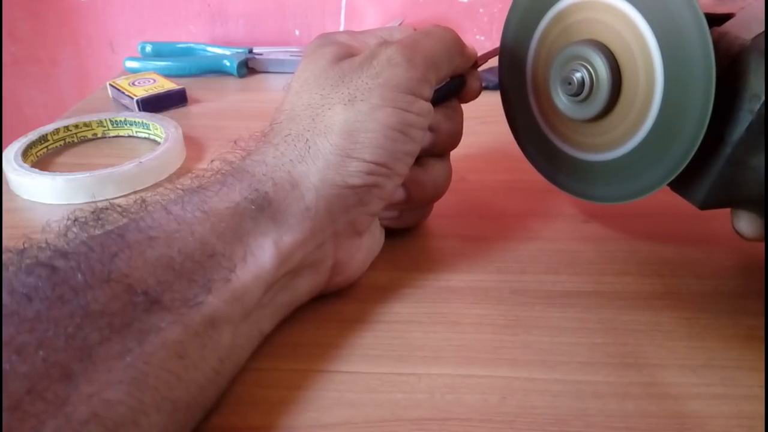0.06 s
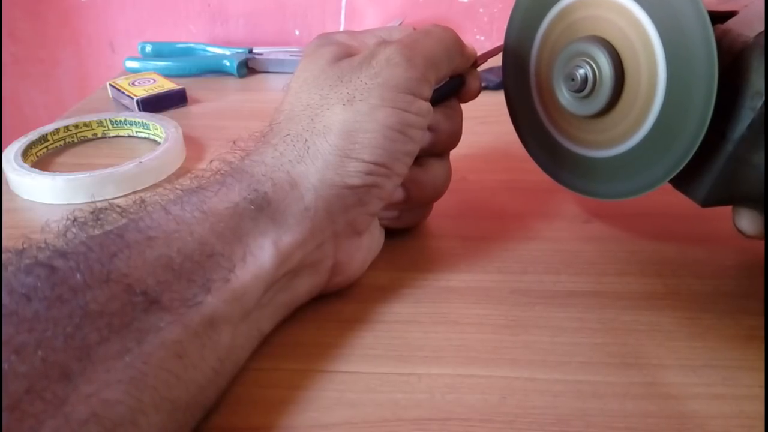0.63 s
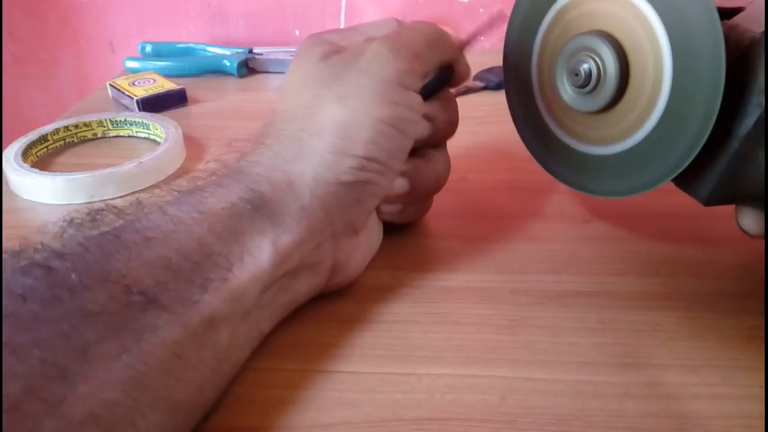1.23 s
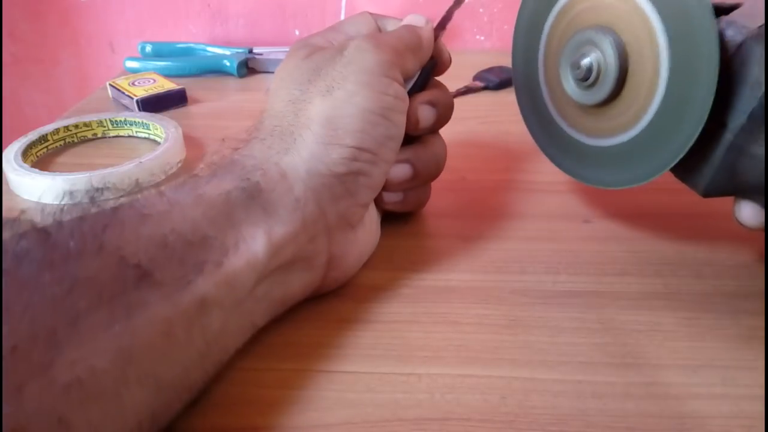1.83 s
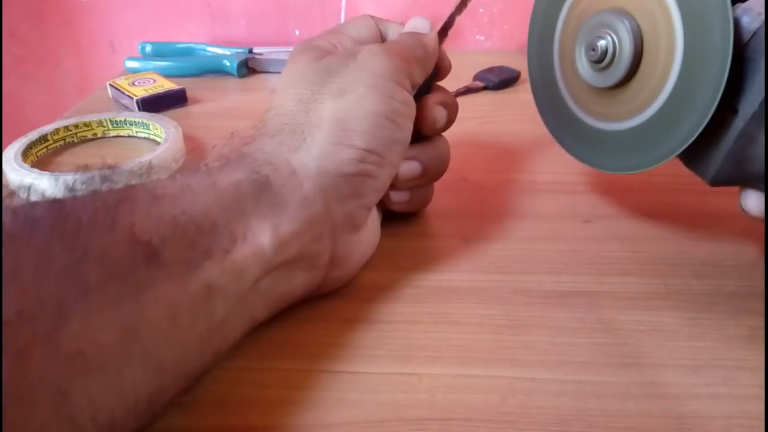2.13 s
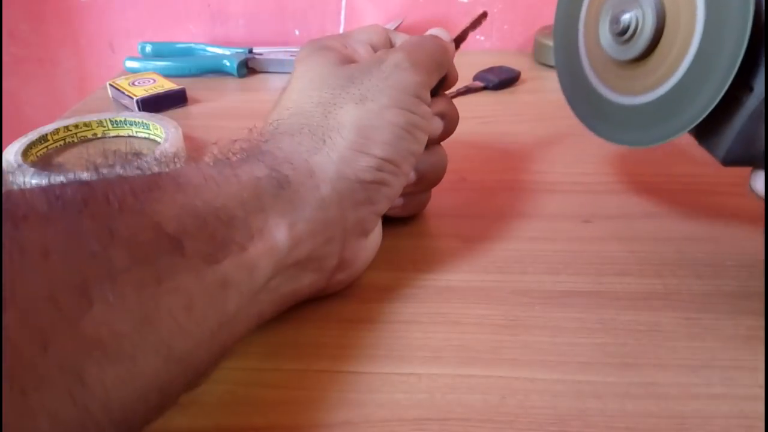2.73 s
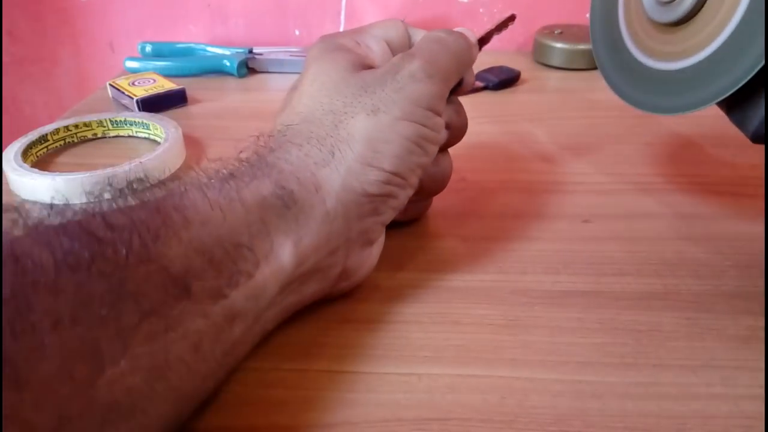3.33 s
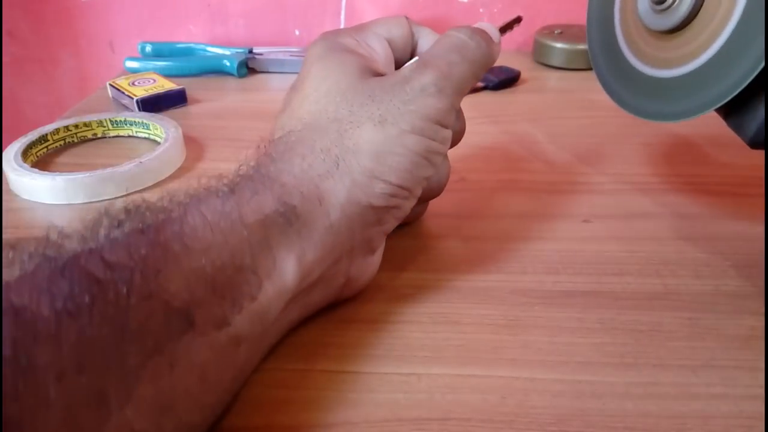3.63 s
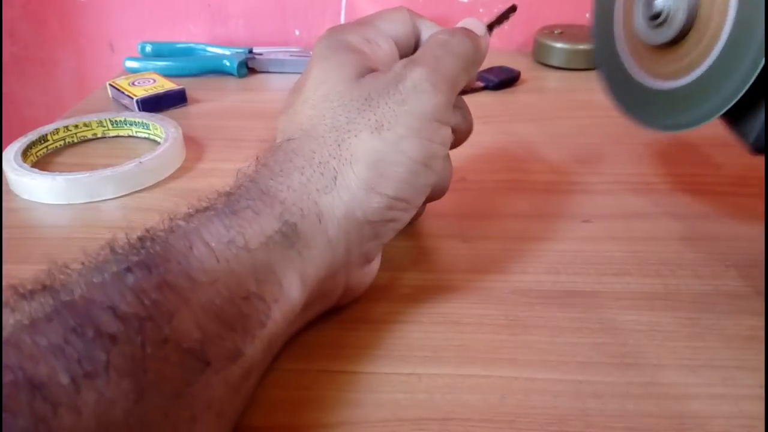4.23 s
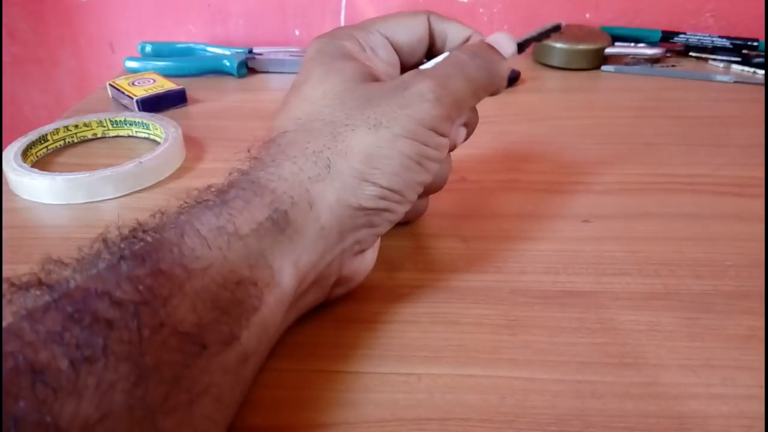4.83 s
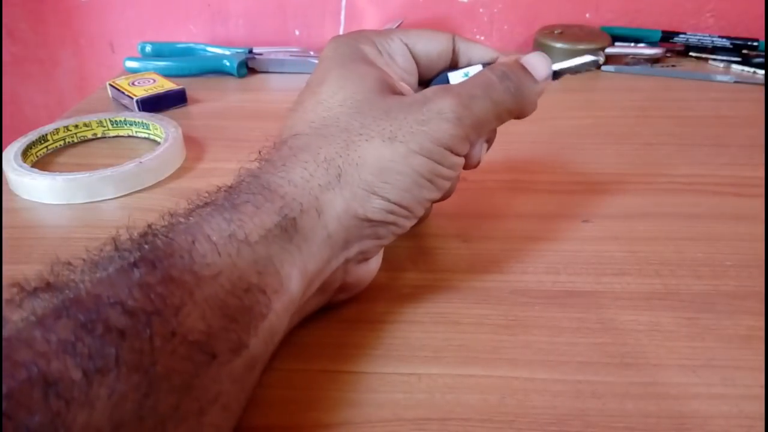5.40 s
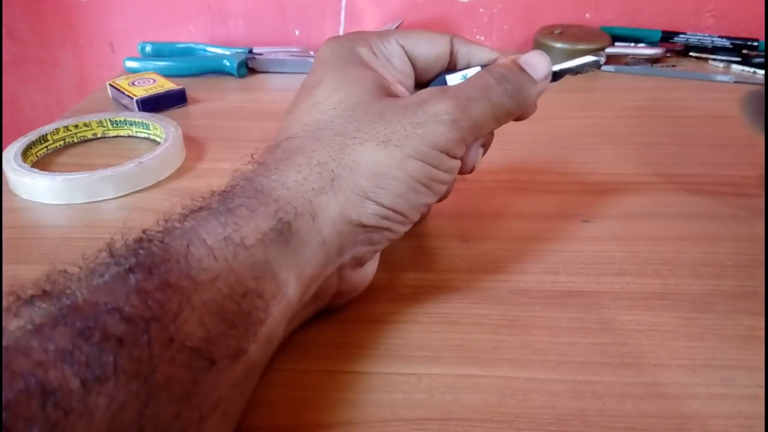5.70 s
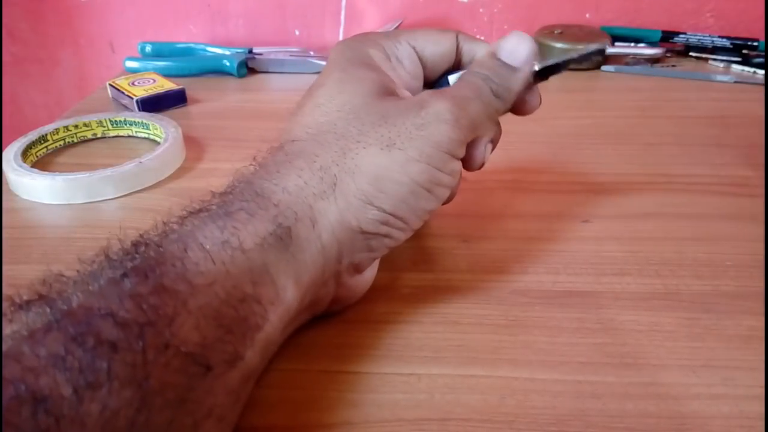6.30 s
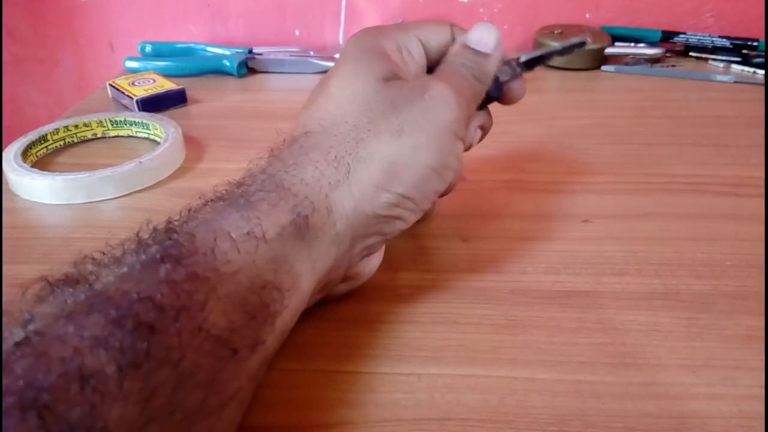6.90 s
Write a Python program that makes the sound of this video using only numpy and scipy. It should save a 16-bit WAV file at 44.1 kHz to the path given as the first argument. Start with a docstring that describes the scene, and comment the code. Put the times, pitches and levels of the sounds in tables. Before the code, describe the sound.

An angle grinder is already running close by, with a steady high whine, a rush of air and a buzz of gears. During the first second a metal key touches the wheel in three light strokes, each a fine, high hiss. The motor sounds a little louder and clearer just after that. At about 1.9 seconds the power goes off, and the whine falls steadily in pitch and fades. From about 3 to 4.5 seconds the slowing gears give quick, hard knocks and small metallic pings as the tool moves slightly left. A bright, ringing rattle carries on and slows, breaking into sharp clacks from about 5.7 seconds and stopping near 6.3. At about 6.6 seconds the grinder is put down on a hollow surface with a soft thud, a few small bumps and a faint slide. The room is small and quiet.

```python
"""An angle grinder whines beside a table while a metal key touches its wheel in three light, hissing strokes.
The hand pulls back, the power goes off, and air drag and friction slow the rotor, so every tone locked
to it falls. Tooth impacts excite the resonances of gears and casing: as the grinder is carried aside
they knock and rattle on to a few last clacks. It is put down on a hollow surface with a soft thud."""
import sys
import numpy as np
from scipy import signal
from scipy.fft import irfft
from scipy.io import wavfile
from scipy.ndimage import uniform_filter1d, map_coordinates

SR = 44100
rng = np.random.default_rng(int(sys.argv[2]) if len(sys.argv) > 2 else 0)


def persist_wave(psi):
    """Save psi, clipped to +-1, as 16-bit WAV."""
    counts = np.round(np.clip(psi, -1, 1) * 32767).astype(np.int16)
    wavfile.write(sys.argv[1], SR, np.atleast_2d(counts).T)


N = 315305
T = np.arange(N) / SR
RUN_HZ, POWER_OFF_S, STOP_S = 558.8, 1.883, 6.317
PINION_TEETH, WHEEL_TEETH, COMMUTATOR_BARS = 11, 39, 12

# Direction of the grinder: time_s, left_ear_lead_ms, left_over_right_db
BEARING = [(0, 0.069, -2), (2.6, 0.11, -1.5), (4.2, 0.38, -1), (4.7, 0.363, 2), (5.8, 0.34, 0)]
# Level law of the fan: full_speed_db, loss_per_speed_halving_db, hand_shadow_db, aside_loss_db
FAN_LEVEL = (-25, 2.5, 3, 10)


def rotor_speed():
    """Turns per second: steady under power, then braked by quadratic air drag and constant friction."""
    drag_shape = .9526  # larger means a steeper first fall
    remaining = np.clip((STOP_S - T) / (STOP_S - POWER_OFF_S), 0, 1)
    return RUN_HZ * np.tan(drag_shape * remaining) / np.tan(drag_shape)


def whine(speed, turns):
    """Rotor unbalance radiates a tone; as it falls, its echoes interfere differently at each ear."""
    # Level law: full_speed_db, loss_per_speed_halving_db, hand_shadow_db, aside_loss_db
    whine_level = (-28.3, 9.8, 5, 6.5)
    # Reflections from table and walls: delay_ms, gain
    left_echoes = [(3.92, .65), (5.44, .35), (7.12, .65), (10.36, .35), (17.16, .25), (20.28, .35),
                   (35.56, .15), (45.04, .15), (48.08, .15)]
    right_echoes = [(3.76, .25), (7.0, .8), (15.52, .5), (17.28, .5), (19.92, .15), (30.96, .35),
                    (38.68, .25), (55.2, .15), (64.92, .15)]
    # Brief dips of the tone: middle_s, half_length_s, left_db, right_db
    dips = [(2.21, .025, 0, -7), (2.3, .022, -9, 0), (2.49, .028, -20, -3), (2.82, .025, -8, -2),
            (3.03, .03, -8, 0), (3.495, .028, -7, -8), (3.85, .028, -10, -3), (4.45, .025, -10, -8)]
    waver = amp(.7 * drift(5))
    swung_away = amp(-9 * (1 - until(4.36, 0.16))) * until(4.85, 0.12)
    tone = np.sqrt(2) * np.sin(2 * np.pi * turns)
    direct = place(source_gain(speed, whine_level) * waver * swung_away * tone)
    echoed = [ear + sum(gain * np.interp(T - ms / 1000, T, ear) for ms, gain in echoes)
              for ear, echoes in zip(direct, (left_echoes, right_echoes))]
    dip_db = sum(np.outer(ears_db, swell(s, half_s)) for s, half_s, *ears_db in dips)
    return amp(dip_db) * np.array(echoed)


def wheel_wobble(speed, turns):
    """Wheel and rotor give combination tones; the slowing wobble sweeps through a table resonance."""
    # Combination tones: rotor_multiple, wheel_multiple, relative_db
    orders = [(0, 1, -34.5), (0, 2, -20.5), (0.999, -1, -26.5), (1, 1, -17.5)]
    rotor = 2 * np.pi * turns
    wheel = rotor * PINION_TEETH / WHEEL_TEETH
    boom = amp(-48 + 1.5 * drift(10)) * resonate(np.sin(wheel), hz=97.6, width_hz=13)
    tones = sum(amp(db + 4.8 * drift(0.55)) * np.sin(a * rotor + b * wheel) for a, b, db in orders)
    tones *= amp(-1) * source_gain(speed, FAN_LEVEL) * until(POWER_OFF_S, 0.59)
    return np.sqrt(2) * (boom * until(3.55, 0.18) + tones)


def rotor_harmonics(speed, turns):
    """Harmonics of the rotation; the lowest two swell in turn as they fall through a shell resonance."""
    # Harmonic series: rotor_multiple, relative_db, right_ear_lag_cycles
    orders = [(2, -13, .05), (3, -9, .24), (5, -15, .15), (7, -14.5, .42), (9, -13, .42), (10, -18, .05),
              (11, -15.5, .4), (12, -11, .25), (13, -18, .2)]
    angle = 2 * np.pi * turns
    shaft = angle + .04 * drift(11)
    tones = sum(amp(db + 2.8 * drift(4.2)) * np.sin([k * shaft, k * shaft - 2 * np.pi * lag])
                for k, db, lag in orders)
    tones *= amp(-1) * source_gain(speed, FAN_LEVEL) * until(POWER_OFF_S, 0.59)
    lowest = sum(amp(db) * np.sin(k * angle + 1.1 * drift(60)) for k, db in [(2, -36.5), (3, -42)])
    shell = resonate(lowest, hz=660, width_hz=160) * until(4.3, 0.3)
    return np.sqrt(2) * (tones + shell)


def commutator(speed, turns):
    """The brushes' bar-passing tones whistle in turn as they fall through the housing's passband."""
    # Brush tones: bar_rate_multiple, level_db
    harmonics = [(1, -31), (2, -30.8)]
    # Radiation response of the housing: frequency_hz, gain_db
    housing = [(3000, -24), (3650, -13), (3950, -9), (4150, -2.5), (4500, 0), (4950, 1), (5150, -8),
               (5900, -18), (6800, -28)]
    phase = 2 * np.pi * COMMUTATOR_BARS * turns + .35 * drift(35) + .17 * drift(220)
    bar_hz = COMMUTATOR_BARS * speed
    tones = sum(amp(db + value_at(housing, k * bar_hz) + 2.5 * drift(40)) * np.sin(k * phase)
                for k, db in harmonics)
    return np.sqrt(2) * tones * until(4.7, .2)


def mains_hum(turns):
    """While powered, the motor hums at 100 Hz, with a sum tone from modulation by the rotation."""
    mains = 2 * np.pi * 100 * T
    hum = amp(-58.5) * np.sin(mains) + amp(-63) * np.sin(2 * np.pi * turns + mains)
    return np.sqrt(2) * until(POWER_OFF_S, 0.042) * hum


def gear_train(speed, turns):
    """Impact excitation: tooth blows ring the gears, shake the casing and modulate the fan's rush."""
    turning, looseness = until(6.12, 0.036), 1 - until(4.35, 0.26)
    blows = tooth_blows(turns, spread_db=4, decay_s=0.001)
    scrape_power = .45 * looseness * (1 - blows ** 2)  # loose teeth scrape between blows
    blows = turning * np.sqrt(blows ** 2 + scrape_power)
    bite = tight_spot(turns)
    drive = blows * np.sqrt(bite)
    steel = np.sqrt(looseness) * loose_gears(drive, ring_drive=blows * bite)
    steel += np.sqrt(1 - looseness) * meshed_gears(speed, drive)
    buzz = housing_buzz(drive)
    body = casing_chatter(speed, turns, drive) + fan_rush(speed, drive, turning)
    body *= amp(4.5 * swell(5.98, 0.086))  # the last slow turns grate
    dip = amp(-3.5 * swell(2.1, 0.011))
    return dip * (body + steel + buzz)


def tooth_blows(turns, spread_db, decay_s):
    """Envelope of an impulse train at the meshing rate: each tooth strikes with a random force."""
    meshing = np.diff(np.floor(turns * PINION_TEETH + .3 * drift(200)), prepend=0) > 0
    unevenness = 0.35 + 0.76 * until(4.06, 0.7)  # slow teeth strike more evenly
    force_db = unevenness * spread_db * np.clip(rng.standard_normal(N), -3, 2.5)
    power = signal.lfilter([1], [1, -np.exp(-2 / (decay_s * SR))], meshing * amp(force_db) ** 2 + 1e-12)
    mean_power = abs(uniform_filter1d(power, size=3500))
    return np.sqrt(power / (mean_power + 1e-6))


def tight_spot(turns):
    """Amplitude modulation: loose gears bite once a turn, harder as they slow, easing near the stop."""
    bite = np.exp(2.8 * (np.cos(2 * np.pi * turns) - 1))
    depth = 3.4 * (1 - until(4.3, 1.3)) * until(5.8, .45)
    return np.sqrt((1 + depth * bite * amp(1.5 * drift(30))) / (1 + depth / 4))


def meshed_gears(speed, drive):
    """Forced vibration of tightly meshed gears, weaker once the motor stops loading them."""
    # Spectrum of the gear steel: frequency_hz, level_db
    spectrum = [(1710, -24.5), (2900, -3.5), (3870, -3.5), (4490, -2), (5700, 1.5), (6130, 4.5),
                (6370, 1.5), (6520, 5.5), (6900, -5), (7400, -4.5), (8050, -12), (9070, -10.5),
                (11600, -17), (12700, -11.5), (13500, -29.5), (14700, -4.5), (15600, -14.5)]
    # Level law: full_speed_db, loss_per_speed_halving_db, hand_shadow_db, aside_loss_db
    gear_level = (-19.5, 0.1, 2, -5.5)
    unloading = amp(-3 * (1 - until(POWER_OFF_S, 0.42)))
    return source_gain(speed, gear_level) * unloading * colour_pair(noise_at_ears(drive, 0.065), spectrum)


def loose_gears(drive, ring_drive):
    """Slack gears rattle in a broad band and ring in two wandering resonances."""
    # Spectrum of the rattle: frequency_hz, level_db
    spectrum = [(1760, -33), (3000, -6.5), (3610, -4.5), (4180, -4), (4830, 2), (5860, -13), (6230, 4.5),
                (7060, -5), (9050, -10.5), (11600, -17.5), (13500, -17.5), (14900, -14), (15600, -8)]
    # Gear resonances: time_s, upper_pitch_hz, lower_pitch_hz
    pitches = [(4.45, 6000, 5300), (4.6, 5600, 5200), (4.8, 5480, 4700), (4.97, 5750, 5200),
               (5.16, 5680, 4760), (5.3, 5730, 4930), (5.44, 6070, 5540), (5.56, 6160, 5650),
               (5.8, 5850, 5150), (5.95, 6200, 4870), (6.05, 5727, 5000), (6.2, 5470, 4900)]
    # Course of the level: time_s, level_db
    levels = [(4.45, -23), (4.58, -20.5), (4.68, -21.5), (4.82, -20), (4.96, -21), (5.05, -21.5),
              (5.15, -20), (5.205, -24), (5.26, -20), (5.5, -21), (5.82, -21.5), (5.98, -24.5), (6.12, -24)]
    upper = wandering_ring(ring_drive, curve(pitches))
    lower = wandering_ring(ring_drive, curve(pitches, column=2))
    rattle = colour_pair(noise_at_ears(drive, 0.17), spectrum)
    return amp(curve(levels)) * unit(rattle + 1.05 * unit(upper + amp(-4) * lower))


def wandering_ring(drive, hz):
    """Tooth blows excite a steep resonance whose frequency wavers around a curve."""
    hz = hz + 80 * drift(22)
    return unit(np.array([resonate_twice(ear, hz, width_hz=540) for ear in noise_at_ears(drive, 0.43)]))


def casing_chatter(speed, turns, drive):
    """Play in the wheel shaft modulates the casing's vibration at the wheel's rotation rate."""
    # Spectrum of the casing: frequency_hz, level_db
    spectrum = [(880, -48.5), (1500, -11.5), (1630, -2), (2040, 3), (2440, 2.5), (3150, -4), (3870, -8),
                (4200, -9.5), (5460, -54.5), (9240, -120)]
    # Level law: full_speed_db, loss_per_speed_halving_db, hand_shadow_db, aside_loss_db
    casing_level = (-21.5, 6, 3, 0.5)
    wheel = 2 * np.pi * turns * PINION_TEETH / WHEEL_TEETH
    play = unit(amp(1.1 * drift(47) + 2 * np.cos(wheel + drift(30))))
    chatter = colour_pair(noise_at_ears(drive * play, 0.23), spectrum) * amp([[-.7], [.7]])
    thinning = amp(-2 * swell(3.85, .5))  # while the gears knock
    return source_gain(speed, casing_level) * thinning * chatter


def housing_buzz(drive):
    """Tooth blows force the housing to buzz in a band near 4.5 kHz."""
    # Bouts of buzzing: middle_s, half_length_s, level_db
    buzzes = [(3.27, 0.098, -28), (3.44, 0.11, -25.5), (3.85, 0.24, -27), (4.22, 0.15, -25.5),
              (4.8, 0.15, -33.5), (5.19, 0.15, -29.5)]
    band = [(3000, -49.5), (4100, -16.5), (4550, -6.5), (5000, -16), (6500, -37)]
    return bouts(buzzes) * colour_pair(noise_at_ears(drive, 0.26), band)


def fan_rush(speed, drive, turning):
    """Broadband fan noise: a steady part and a part modulated by the tooth blows."""
    # Lower and upper spectrum of the fan: frequency_hz, level_db
    lows = [(30, -46.5), (70, -39), (130, -23), (230, -11.5), (400, -7)]
    highs = [(350, -36), (600, -0.5), (708, 2.5), (945, -0.5), (1100, 5.5), (1330, 6), (1470, 0.5),
             (1720, 3.5), (2600, -5), (3380, -15.5), (5720, -120)]
    envelope = np.sqrt(drive ** 2 + 0.073 * turning)
    return source_gain(speed, FAN_LEVEL) * colour_pair(noise_at_ears(envelope, 0.72), lows + highs[1:])


def backlash():
    """Impacts across the gear play excite damped modes: knocks, pings and, near the stop, clacks."""
    # Single clacks of the teeth: start_s, level_db
    clacks = [(5.6765, -7), (5.7757, -10), (5.7947, -8), (5.8213, -10), (5.842, -10), (5.886, -14),
              (5.9118, -13), (5.9345, -14), (5.961, -14), (5.996, -11), (6.1002, -16), (6.1411, -11.5),
              (6.165, -10.5), (6.1776, -11), (6.186, -15), (6.193, -11.5), (6.2237, -12), (6.2342, -11)]
    # Modes of a clack: pitch_hz, width_hz, level_db
    clack_modes = [(4100, 240, -19), (5570, 100, 0), (5800, 200, -7), (6500, 220, -10), (9400, 240, -24)]
    # Contact noise of a clack: frequency_hz, level_db
    crunch_spectrum = [(200, -44), (750, -3), (1500, -5), (2600, -2), (4300, 3.5), (6500, 9.5),
                       (8000, -3.5), (15000, -11)]
    # Hard knocks: start_s, level_db, pitch_hz
    knocks = [(2.933, -9.5, 2800), (3.1144, -6, 2670), (3.5367, -5, 2420), (3.556, -1, 2270),
              (3.5663, -12, 2650), (3.6126, -5.5, 2330), (3.6395, -7, 2240), (3.6711, -8.5, 2220),
              (3.699, -4, 2280), (3.722, -9, 2210), (3.7440, -7, 2220), (3.7852, -14, 2330),
              (3.7982, -9.5, 2600), (3.8151, -12, 2600), (3.8631, -16, 2665), (3.8865, -6, 2110),
              (3.9279, -9.5, 2180), (3.9508, -8, 1960), (3.9628, -15, 2540), (3.9728, -7, 2080),
              (3.9965, -9, 2070), (4.0208, -11, 2620), (4.0375, -13, 2600), (4.048, -8.5, 2030),
              (4.0608, -12.5, 2380), (4.087, -13, 2130), (4.0975, -11, 2660), (4.1295, -15, 2110),
              (4.1768, -18.5, 2630), (4.2576, -15, 2770), (4.276, -11, 2780), (4.2934, -16, 1890),
              (4.3090, -10, 3070), (4.3326, -8, 1810), (4.3674, -12.5, 2270), (4.4053, -12, 2100),
              (4.4513, -15, 3020), (4.465, -17.5, 2960), (4.538, -15, 2840), (4.5504, -10, 3020)]
    # Modes of a knock: pitch_multiple, width_hz, level_db
    knock_modes = [(1, 360, 0), (1.3, 480, -7), (2.03, 480, -9)]
    # Glancing blows on the steel: start_s, level_db
    pings = [(2.9321, -17), (3.0289, -18), (3.1033, -11.5), (3.159, -24), (3.1903, -15), (3.5662, -21),
             (3.5996, -13.5), (3.653, -21), (3.7079, -14), (3.7324, -19), (3.7982, -16), (3.877, -21),
             (3.9383, -17), (3.983, -14)]
    out, t = np.zeros(N), np.arange(SR // 12) / SR
    for s, db in clacks:
        crunch = burst(t, decay_s=.003)
        steel = unit(signal.fftconvolve(crunch, ring(clack_modes, t))[:len(t)])
        add(out, s, db, 0.69 * steel + unit(colour(crunch, crunch_spectrum)))
    for s, db, pitch_hz in knocks:
        modes = [(pitch_hz * multiple, width, level) for multiple, width, level in knock_modes]
        knock = ring(modes, t) * (1 - np.exp(-t / 0.00045)) + 0.26 * burst(t, decay_s=0.0015)
        add(out, s, db, colour(knock, [(300, -27.5), (1800, 12), (7000, 6.5), (9000, -16.5)]))
    for s, db in pings:
        pitch_hz = 6330 + 85 * rng.standard_normal()
        add(out, s, db, ring([(pitch_hz, 105, 0)], t) * (1 - np.exp(-t / 0.0012)))
    return out


def key_on_wheel():
    """Shot noise: abrasive grains scratch the key at random and merge into a fine, high hiss."""
    # Strokes of the key: start_s, end_s, level_db
    strokes = [(0, 0.185, -27.5), (0.284, .58, -28.5), (.67, 1.03, -26.5)]
    # Spectrum of the scratches: frequency_hz, level_db
    spectrum = [(5290, -60), (9000, -13), (9340, -42), (10300, 6), (11100, -20), (11600, -10), (12300, 10),
                (13600, -3), (14600, 13), (15600, 5.5)]
    grains_per_s, attack_s, release_s = 7000, 0.011, 0.11
    strength = amp(3.6 * np.minimum(rng.exponential(1, N), 5))
    grains = strength * (rng.random(N) < grains_per_s / SR)
    pressure = sum(amp(db) * (1 - until(start, attack_s)) * until(end, release_s)
                   for start, end, db in strokes)
    return pressure * colour_pair(noise_at_ears(grains, 0.29), spectrum) * amp([[-2.2], [2.2]])


def set_down():
    """The grinder lands and rocks; each impact excites the modes of a hollow surface."""
    # Impacts: start_s, boom_db, contact_db
    bumps = [(6.439, -47, -73), (6.616, -50, -52), (6.635, -34.5, -29), (6.72, -38, -45), (6.841, -42, -51),
             (6.917, -56, -54), (7.038, -45.5, -70)]
    # Modes of the surface: pitch_hz, width_hz, level_db
    modes = [(180, 21, -4.5), (264, 27, -0.5), (289, 15, 0), (462, 49, 0), (1360, 31, -1)]
    # Spectrum of the hard contact: frequency_hz, level_db
    thud = [(40, -12), (250, -8), (950, 5), (1800, -14), (6500, -17.5), (8500, -32), (15000, -40)]
    out, t = np.zeros(N), np.arange(SR // 3) / SR
    for s, boom_db, contact_db in bumps:
        boom = signal.fftconvolve(burst(t, decay_s=0.019), ring(modes, t))
        add(out, s, boom_db, colour(boom, [(50, -4), (200, 3), (1400, -9), (4000, -18)]))
        add(out, s, contact_db, colour(burst(t, decay_s=0.0043), thud))
    return out


def handling():
    """Handling makes bouts of low-frequency noise."""
    # Rumbles: middle_s, half_length_s, level_db
    rumbles = [(5.33, 0.23, -58), (6.27, 0.11, -51), (6.48, 0.12, -60), (6.67, 0.05, -48.5),
               (6.95, 0.14, -61.5)]
    spectrum = [(40, -33), (65, -24.5), (84, 3), (105, 0), (170, -11.5), (300, -10.5),
                (1300, -30), (3000, -52)]
    return bouts(rumbles) * unit(colour(rng.standard_normal(N), spectrum))


def sliding():
    """Friction under the sliding grinder drives a low resonance of the surface, then scrapes faintly."""
    # Slides and scrapes: middle_s, half_length_s, level_db
    slides = [(6.77, 0.037, -45.5), (6.87, .06, -59.5), (7.1, 0.17, -59)]
    scrapes = [(7.11, .03, -62)]
    # Spectrum of the scrape: frequency_hz, level_db
    spectrum = [(1200, -25), (2000, 5), (3200, -26), (5000, -5), (7000, -30)]
    rub, grit = rng.standard_normal((2, N))
    drone = resonate_twice(rub, hz=301, width_hz=63)
    return bouts(slides) * unit(drone) + bouts(scrapes) * unit(colour(grit, spectrum))


def room(pair, tail_db):
    """Reverberation: a short, exponentially decaying diffuse tail, different at each ear."""
    # Reverberation times: frequency_hz, t60_s
    decay_times = [(150, 0.2), (1000, 0.26), (5000, 0.24), (15000, 0.24)]
    t = np.arange(SR // 2) / SR
    hz, s, spectra = signal.stft(rng.standard_normal((2, len(t))), SR, nperseg=256)
    decay = amp(-60 * s / value_at(decay_times, hz)[:, None])
    tail = signal.istft(spectra * decay, SR, nperseg=256)[1][:, :len(t)] * (t > .004)
    tail /= np.linalg.norm(tail, axis=1, keepdims=True)
    return pair + amp(tail_db) * signal.oaconvolve(pair, tail, axes=1)[:, :N]


def room_air():
    """Quiet ambient noise, partly correlated between the ears."""
    # Ambient spectrum: frequency_hz, level_db
    spectrum = [(15, -49.5), (25, -36), (103, -29), (207, -17.5), (293, -0.5), (879, -16.5), (1310, -8),
                (1760, -12.5), (5880, -19), (8320, -29), (15000, -35.5)]
    common, *apart = rng.standard_normal((3, N))
    return amp(-60.5) * colour_pair(common + 2 * np.array(apart), spectrum)


def source_gain(speed, law):
    """A power law of speed, shadowed by the hand at first and shifted as the grinder swings aside."""
    full_db, halving_db, shadow_db, aside_db = law
    covered, aside = until(1.158, 0.02), 1 - until(4.12, 0.93)
    octaves = np.log2(np.maximum(speed / RUN_HZ, .09))
    return amp(full_db + halving_db * octaves - shadow_db * covered - aside_db * aside)


def place(x):
    """Interaural delay: the left ear leads, more so as the grinder moves aside."""
    delayed = np.arange(N) - curve(BEARING) * SR / 1000
    return np.array([x, map_coordinates(x, [delayed], order=3)])


def noise_at_ears(envelope, direct_share):
    """Modulated noise: a share of the power comes straight, the rest scatters off table and wall."""
    straight, *scattered = rng.standard_normal((3, N))
    smeared = np.sqrt(signal.lfilter([.02], [1, -.98], envelope ** 2 + 1e-18))
    direct = np.sqrt(direct_share) * place(envelope * straight)
    return direct + np.sqrt(1 - direct_share) * smeared * np.array(scattered)


def resonate(x, hz, width_hz):
    """A resonance of unit gain whose frequency can follow a curve."""
    phasor = np.exp(2j * np.pi * np.cumsum(hz * np.ones(N)) / SR)
    pole = np.exp(-np.pi * width_hz / SR)
    return 2 * (phasor * signal.lfilter([1 - pole], [1, -pole], x * phasor.conj() + 1e-18)).real


def resonate_twice(x, hz, width_hz):
    """Two equal resonances in cascade give steeper skirts."""
    return resonate(resonate(x, hz, width_hz), hz, width_hz)


def ring(modes, t):
    """Free decay of damped modes: pitch_hz, width_hz, level_db."""
    return sum(amp(db) * np.exp(-np.pi * width * t) * np.cos(2 * np.pi * hz * t)
               for hz, width, db in modes)


def burst(t, decay_s):
    """Exponentially decaying contact noise."""
    return rng.standard_normal(len(t)) * np.exp(-t / decay_s)


def colour(x, spectrum):
    """Minimum-phase filter through the points frequency_hz, gain_db."""
    size = 4096
    log_gain = np.log(amp(value_at(spectrum, abs(np.fft.fftfreq(size, 1 / SR)))))
    taps = np.fft.ifft(np.exp(np.conj(signal.hilbert(log_gain)))).real
    return signal.oaconvolve(x, taps[:size // 2])[:len(x)]


def colour_pair(pair, spectrum):
    """Both ears through one filter, at unit rms."""
    return unit(np.array([colour(x, spectrum) for x in pair]))


def value_at(points, hz):
    """Interpolation on a logarithmic frequency axis."""
    f, value = np.transpose(sorted(points))
    return np.interp(np.log(hz + 1), np.log(f + 1), value)


def drift(hz):
    """Random fluctuation of unit rms, low-passed at hz."""
    f = np.arange(2048) * SR / N
    spectrum = (rng.standard_normal(len(f)) + 1j * rng.standard_normal(len(f))) / (1 + (f / hz) ** 2)
    slow = irfft(spectrum, 8 * len(f))
    return unit(np.interp(T, np.linspace(0, T[-1], len(slow)), slow))


def curve(rows, column=1):
    """One column of a table, interpolated in time."""
    rows = np.array(rows)
    return np.interp(T, rows[:, 0], rows[:, column])


def until(s, fade_s):
    """One up to the time s, then a linear fade."""
    return np.clip(1 - (T - s) / fade_s, 0, 1)


def swell(s, half_s):
    """Gaussian envelope around the time s."""
    return np.exp(-((T - s) / half_s) ** 2)


def bouts(rows):
    """Envelope of a table of swells."""
    return sum(amp(db) * swell(s, half_s) for s, half_s, db in rows)


def add(mix, s, peak_db, sound):
    """Superposes a sound at a given peak level."""
    part = mix[round(s * SR):][:len(sound)]
    part += amp(peak_db) * sound[:len(part)] / abs(sound).max()


def amp(db):
    return 10 ** (np.asarray(db) / 20)


def unit(x):
    """Scales to unit rms."""
    return x / np.sqrt(np.mean(x ** 2) + 1e-20)


def scene():
    """Superposition at two ears of the grinder, the bumps of putting it down and the room air."""
    # The loose gears hold the rotor back: time_s, turns_lost
    rotor_lag = [(4.6, 0), (5.2, 1.07), (5.83, 1.52), (6.13, 2.2)]
    speed = rotor_speed() * (1 + .0004 * drift(6))
    turns = np.cumsum(speed) / SR
    turns = turns * round(turns[-1]) / turns[-1] - curve(rotor_lag)  # the tight spot is at whole turns
    hum = wheel_wobble(speed, turns) + mains_hum(turns)
    harmonics = rotor_harmonics(speed, turns)
    unbalance = whine(speed, turns)
    bumps = room(np.tile(set_down() + handling() + sliding(), (2, 1)), tail_db=-2)
    air = room_air()
    clatter = amp(0.48) * room(gear_train(speed, turns) + key_on_wheel(), tail_db=-14)
    knocks = room(place(backlash()), tail_db=-6)
    balance = amp(np.array([[.5], [-.5]]) * curve(BEARING, column=2))
    tool = balance * (clatter + knocks + harmonics + commutator(speed, turns))
    return tool + unbalance + hum + bumps + air


def record(dry):
    """Soft saturation rounds the tallest peaks; a low-pass filter then limits the band."""
    ceiling, cutoff_hz = .85, 15600
    rounded = dry / (1 + (dry / ceiling) ** 4) ** .25
    lowpass = signal.firwin(511, cutoff_hz, window=("kaiser", 9), fs=SR)
    return signal.oaconvolve(rounded, lowpass[None], "same")


dry = scene()
out = record(dry)
persist_wave(out)
```